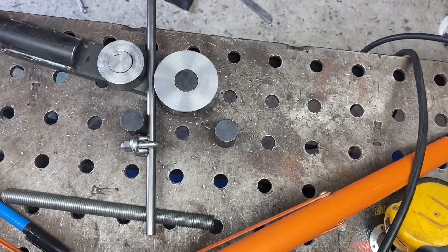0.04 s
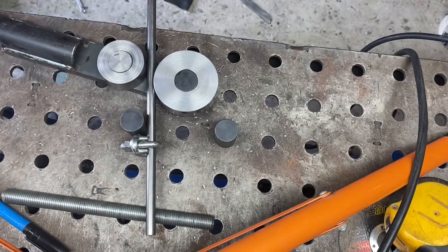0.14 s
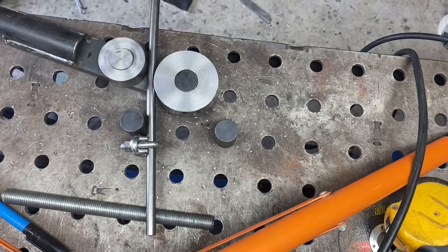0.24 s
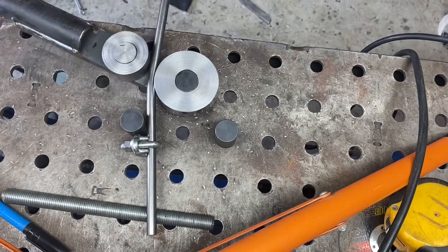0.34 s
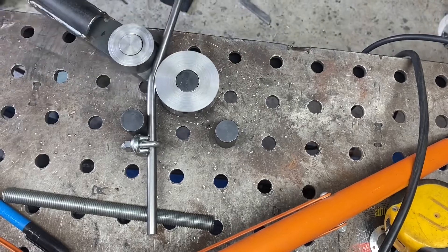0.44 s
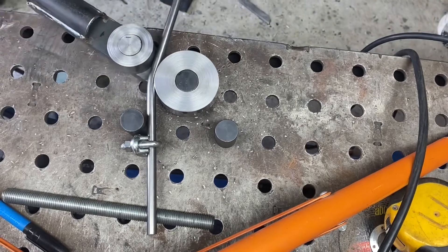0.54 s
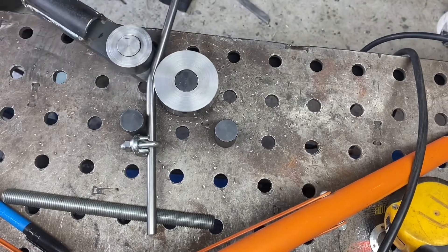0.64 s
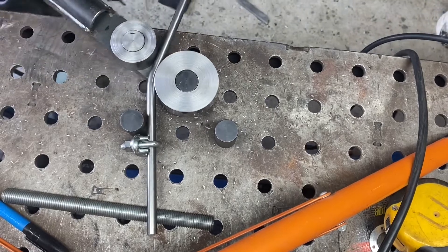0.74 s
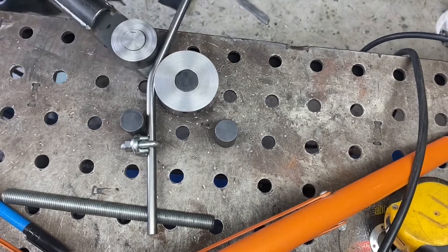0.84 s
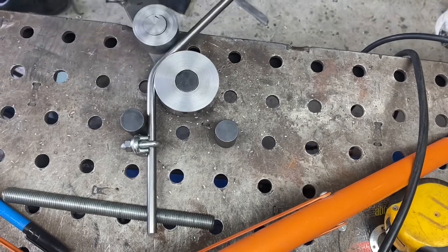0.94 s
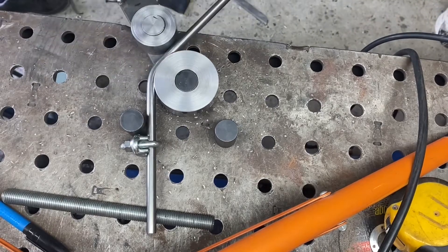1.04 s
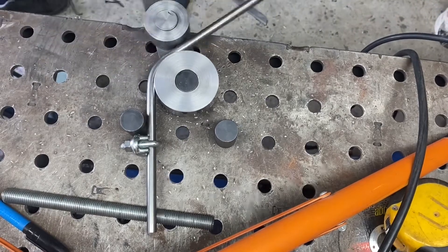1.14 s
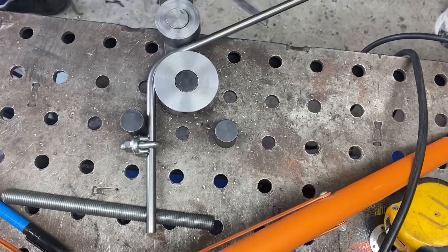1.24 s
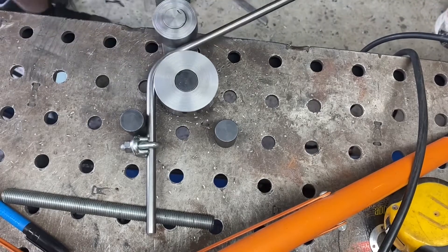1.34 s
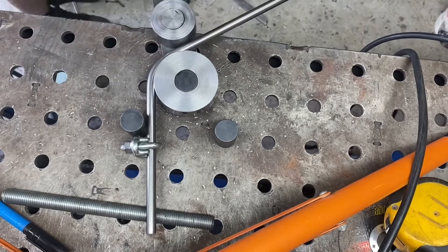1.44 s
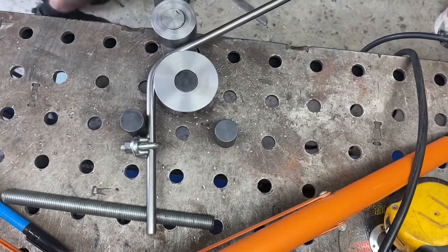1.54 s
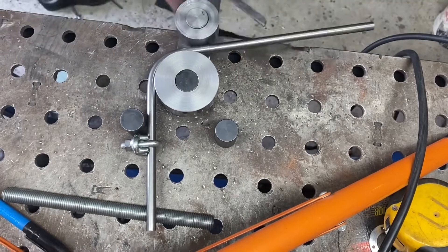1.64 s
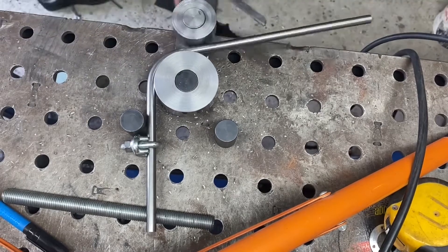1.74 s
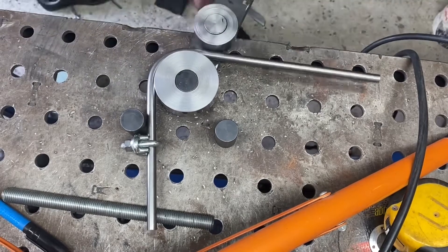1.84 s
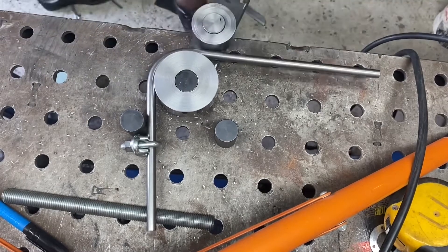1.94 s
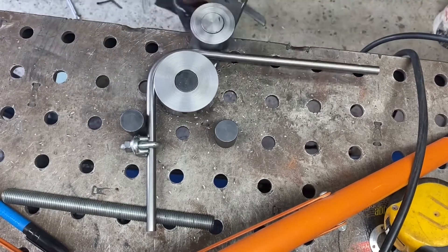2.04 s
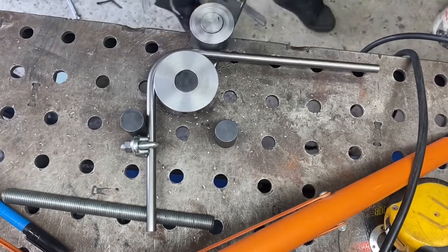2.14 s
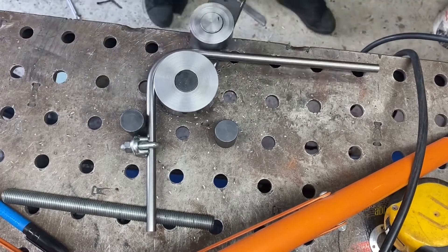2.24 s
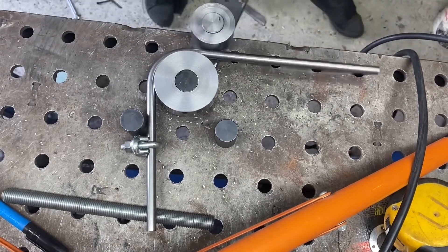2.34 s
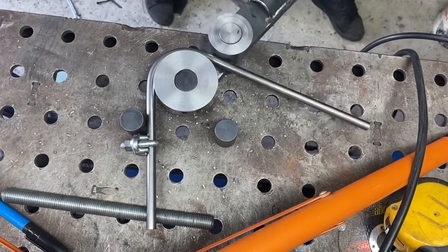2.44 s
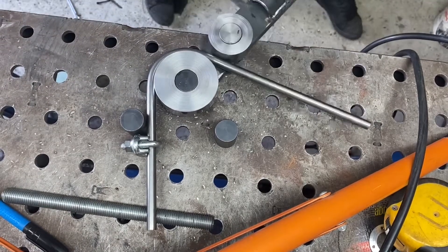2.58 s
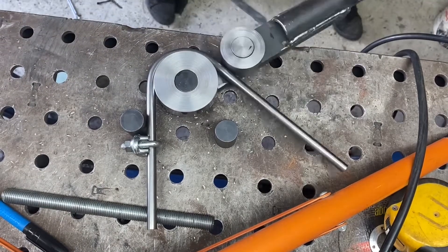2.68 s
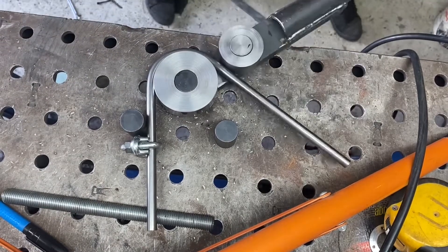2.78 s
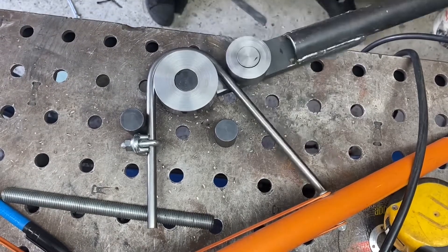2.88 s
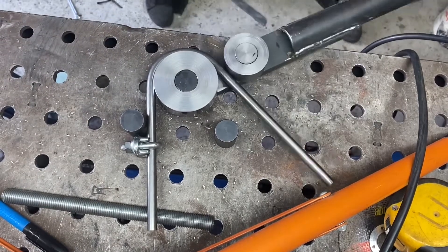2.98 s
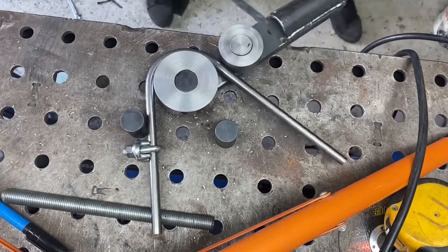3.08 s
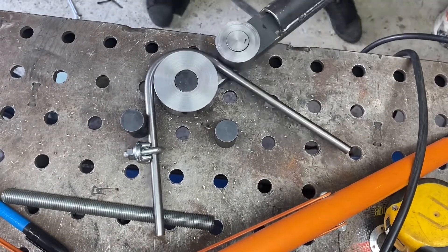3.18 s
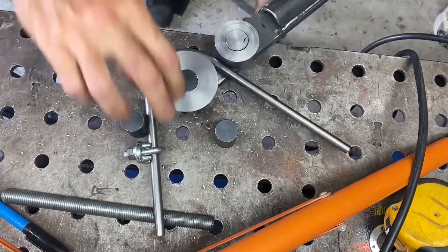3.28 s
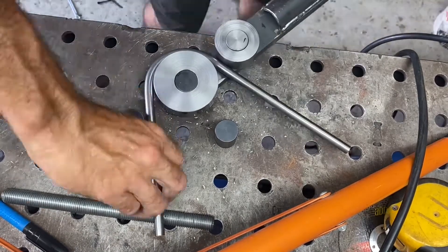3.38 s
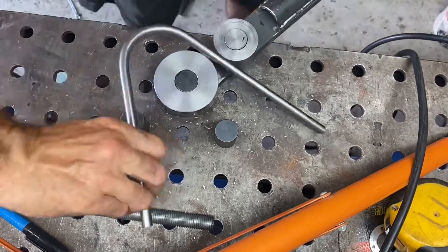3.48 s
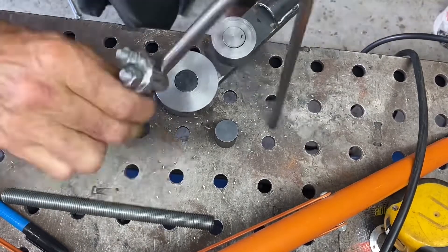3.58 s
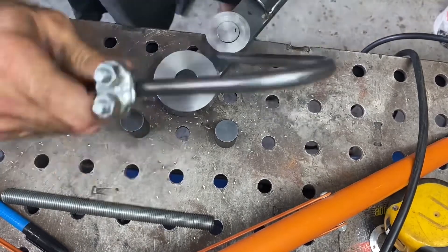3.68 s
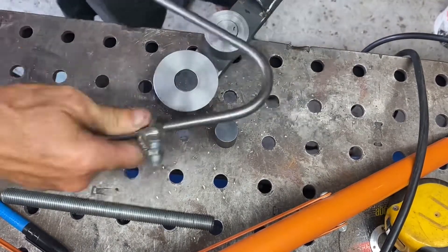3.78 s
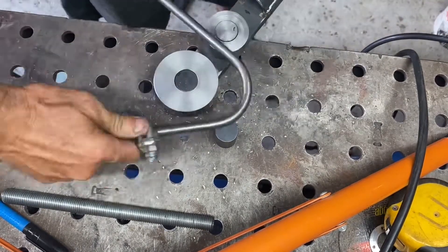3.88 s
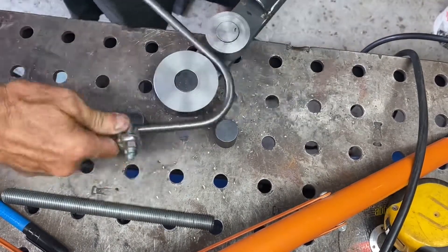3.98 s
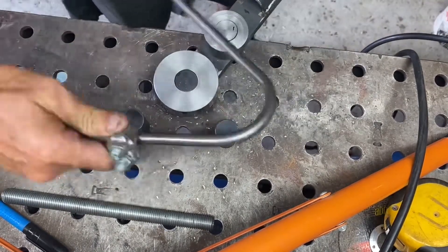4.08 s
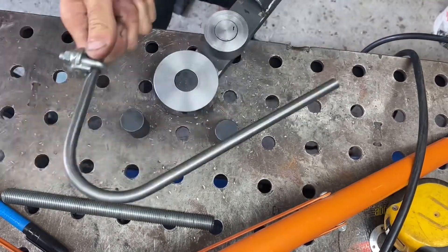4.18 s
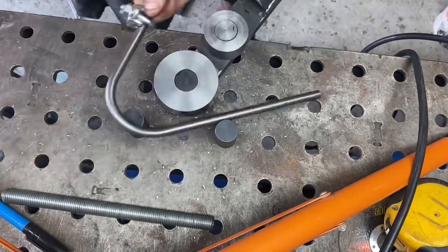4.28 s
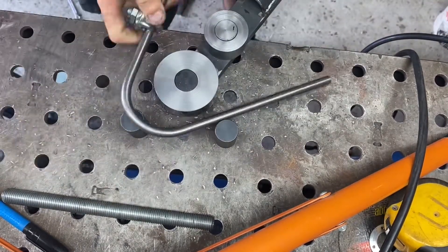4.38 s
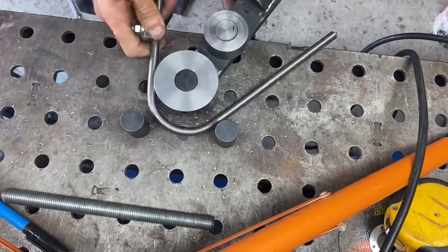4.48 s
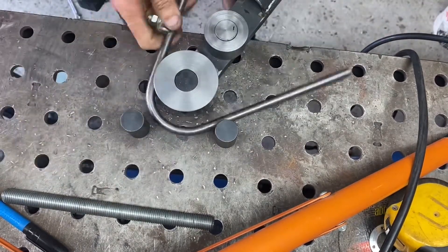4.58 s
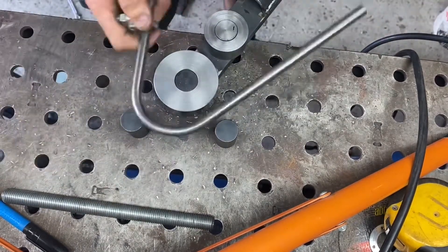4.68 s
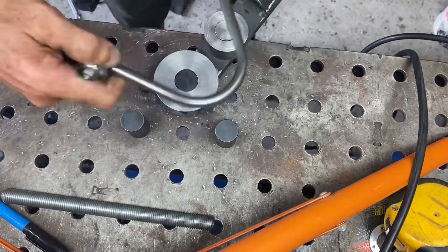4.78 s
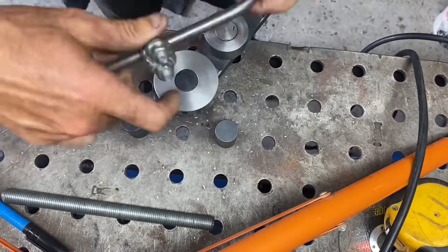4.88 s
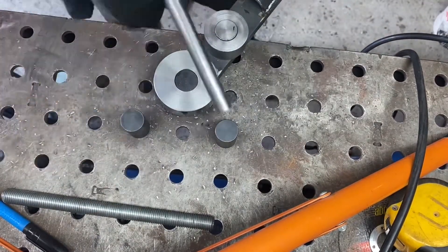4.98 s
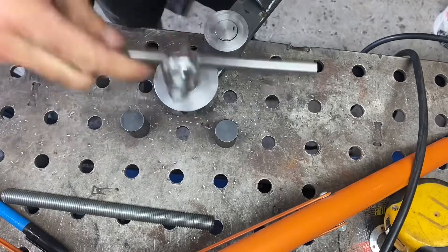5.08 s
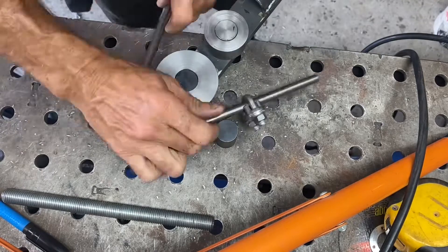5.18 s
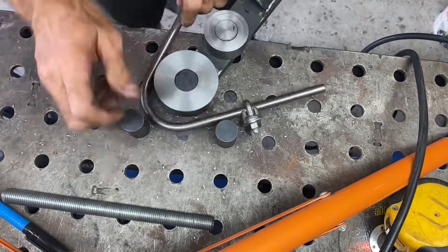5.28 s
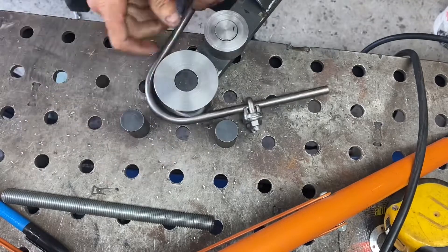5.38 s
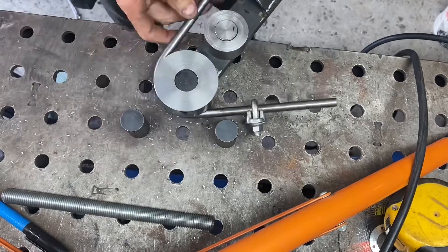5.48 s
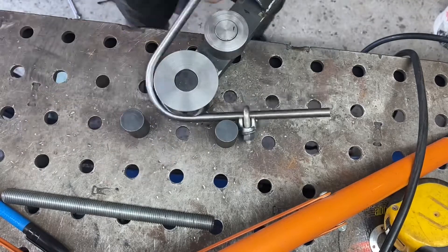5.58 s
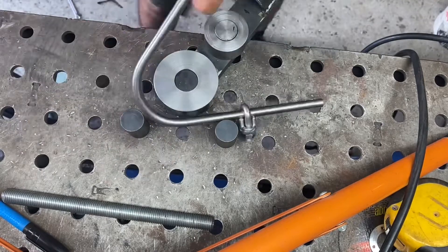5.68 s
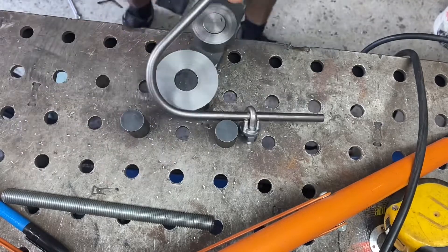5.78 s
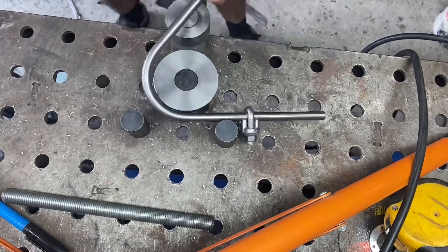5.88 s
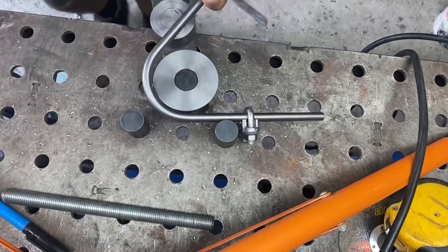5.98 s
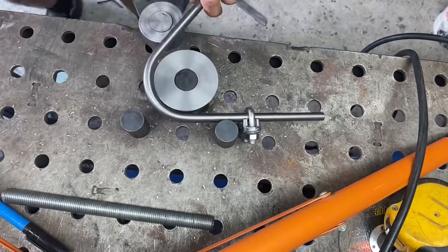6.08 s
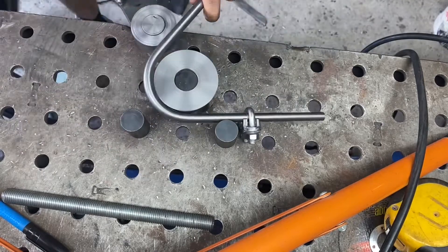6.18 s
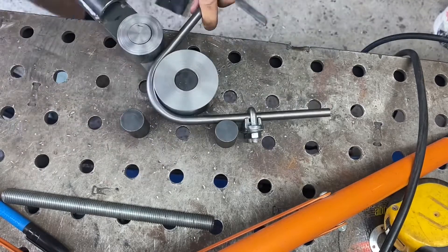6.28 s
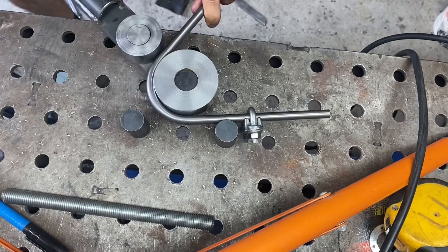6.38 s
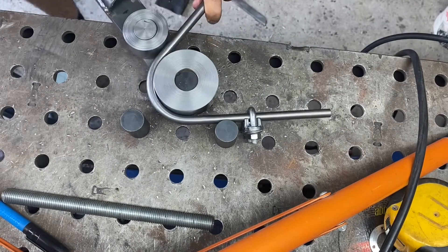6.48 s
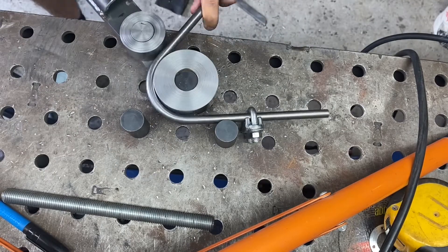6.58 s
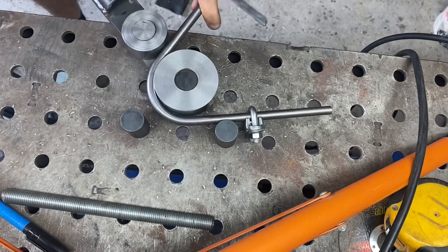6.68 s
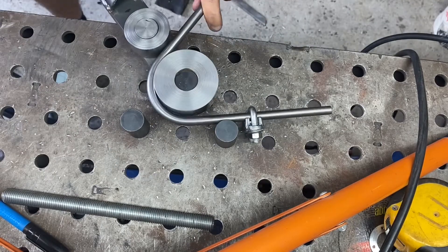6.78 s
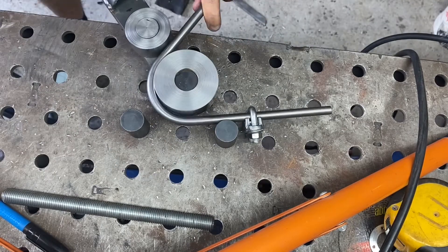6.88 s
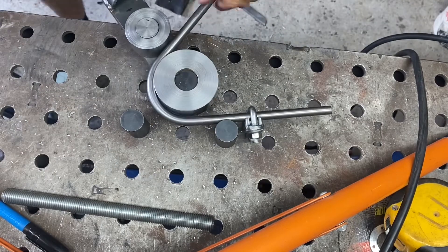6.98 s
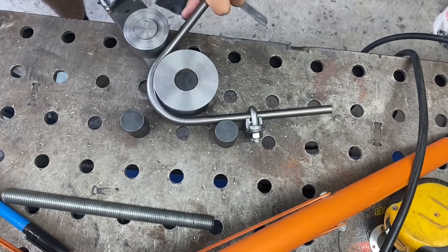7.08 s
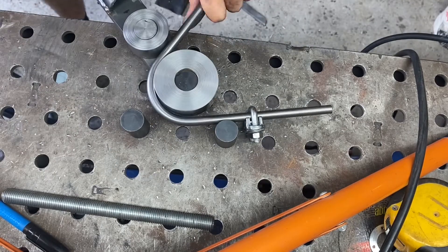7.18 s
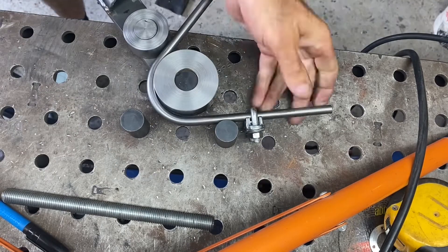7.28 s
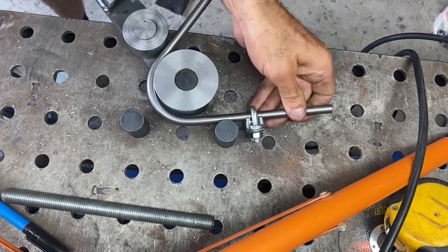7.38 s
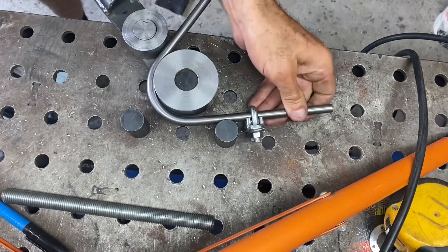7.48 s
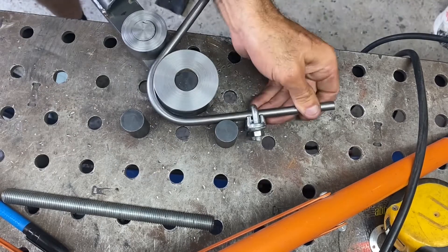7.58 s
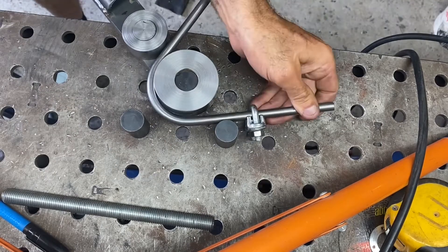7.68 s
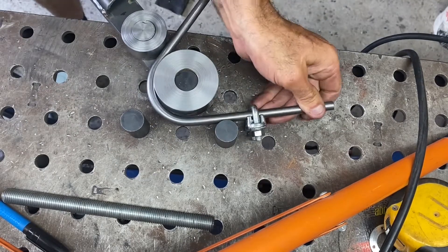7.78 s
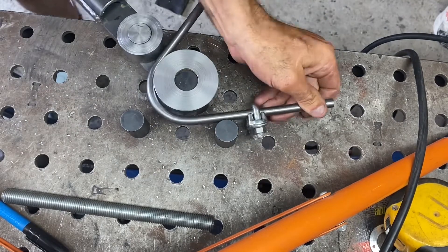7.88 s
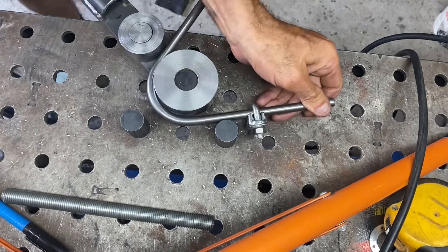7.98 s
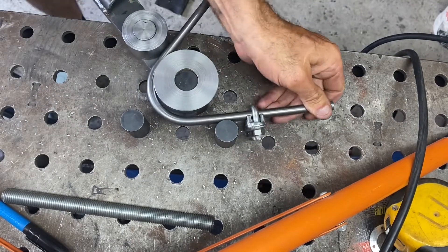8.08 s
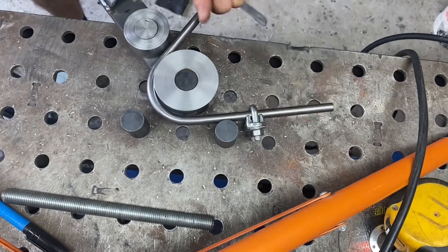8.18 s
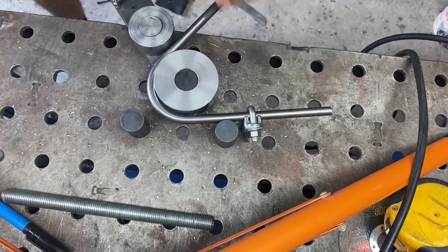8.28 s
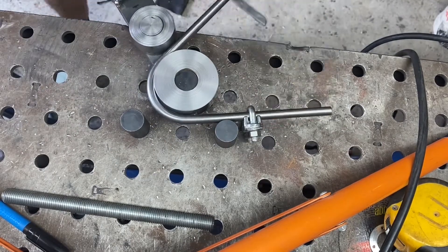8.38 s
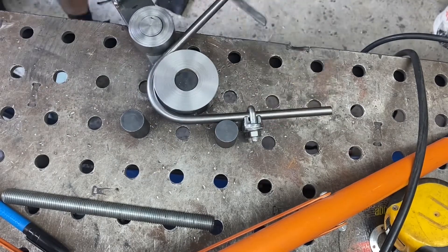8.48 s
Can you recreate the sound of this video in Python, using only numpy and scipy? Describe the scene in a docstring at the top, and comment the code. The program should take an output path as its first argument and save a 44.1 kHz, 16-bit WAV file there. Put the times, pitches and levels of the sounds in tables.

```python
"""A workshop, stereo microphone close over a thick steel table where a steel rod is bent round a die.
Far off, a motor whines faintly in the room noise. Close up, rod, clamp and lever scrape over the
table plate and make it rumble; the straining rod ticks, and sings as it slides. In front, the steel
clinks against pins and die: the hand-held rod rings briefly, lever, pin and nuts ring until damped."""
import sys
import numpy as np
from scipy import signal
from scipy.fft import rfft, irfft
from scipy.io import wavfile
from scipy.ndimage import uniform_filter1d

SR = 44100
rng = np.random.default_rng(int(sys.argv[2]) if len(sys.argv) > 2 else 0)


def pcm_store(signal):
    """Save signal as 16-bit PCM."""
    levels = np.round(np.clip(np.atleast_2d(signal), -1, 1) * 32767)
    wavfile.write(sys.argv[1], SR, levels.astype(np.int16).T)


N = 376161

# left-right likeness at the microphone, for spread sounds and for close blows: f/Hz, correlation
SPREAD_LIKENESS = [(60, 0.66), (180, 0.84), (550, 0.78), (1650, 0.36), (4970, 0.12), (15000, 0.95)]
CLOSE_LIKENESS = [(200, 1), (1500, 0.9), (3000, 0.18), (6000, 0.44), (12000, 0.76)]
# phase by which a close blow leads on the left: f/Hz, lead/rad
LEFT_LEAD = [(100, 0.3), (600, -1.7), (2400, 0.9), (5000, 0.7), (8000, -0.2)]
# colour of the room noise: f/Hz, relative level/dB
ROOM_COLOUR = [(18, -76), (30, -44), (107, -31), (176, -15.5), (235, 2), (814, -1.5), (904, -3),
               (979, -3.5), (1530, -4), (3050, -40.5), (13000, -24.5), (15200, -37), (16500, -49.5)]
# the distant motor and a second faint tone: t/s, f/Hz, level/dB
MOTOR_WHINE = [(0, 893, -73.5), (3.8, 893, -97), (4.1, 893, -86), (4.5, 893, -86.5), (4.7, 893, -71.5),
               (5.4, 893, -67), (5.6, 893, -96), (6.3, 893, -80), (6.5, 893, -76), (7.2, 893, -68),
               (7.35, 880, -76), (7.6, 850, -70.5), (7.9, 820, -68), (8.3, 808, -70), (8.53, 808, -60.5)]
FAINT_TONE = [(0, 730, -103), (3.9, 693, -98), (4.1, 774, -82), (4.6, 748, -85.5), (5.4, 781, -74),
              (5.6, 745, -99), (7.1, 640, -92.5), (7.2, 670, -68.5), (7.3, 765, -65.5), (7.4, 738, -66.5),
              (7.6, 750, -88), (8.3, 744, -66), (8.53, 748, -68.5)]
# low hums that come and go: t/s, length/s, f/Hz, level/dB
LOW_HUMS = [(5.047, 0.21, 246, -58.5), (8.264, 0.31, 248, -56.5)]
# modes of the table plate and of the hand-damped rod: f/Hz, width/Hz, relative level/dB
PLATE_MODES = [(172, 32, 0), (250, 40, -6), (310, 40, -7), (375, 40, -8), (505, 35, -3), (600, 50, -8),
               (880, 90, -6), (1250, 90, -2), (1480, 100, -3), (1900, 140, -3)]
ROD_MODES = [(2170, 34, 3), (2874, 34, -5), (3164, 29, 0), (4030, 63, -3), (4625, 63, 5.5),
             (4876, 8.6, -16.5), (5110, 41, 10.5), (5630, 97, -7.5), (6440, 23, 13), (6740, 9.9, 3),
             (7276, 40, -3), (7970, 23, 2.5), (8240, 48, -13), (7970, 39, -7.5), (8200, 70, 1),
             (9540, 25, -10.5), (8710, 36, -4), (9600, 64, -25), (10260, 20, -13), (10360, 75, 0),
             (11250, 43, -1.5), (12210, 43, -8.5), (12460, 19, -7), (12700, 73, -4), (13500, 33, -12.5),
             (14100, 39, -14), (13100, 110, -11.5), (14550, 88, -2)]
# hands and lever working on the plate: t/s, lowest modes/dB, upper modes/dB
HANDLING = [(0.0, -68, -75), (0.97, -59.5, -63), (1.45, -79.5, -64), (2.59, -66.5, -64.5),
            (3.23, -77, -72.5), (3.68, -74, -61.5), (4.25, -75.5, -73), (4.47, -55.5, -65.5),
            (4.7, -70.5, -80), (4.96, -80, -72), (5.13, -70, -70.5), (5.41, -75.5, -66.5), (6.01, -63, -65),
            (7.06, -70, -72), (7.7, -46.5, -66.5), (7.93, -63.5, -59.5), (8.15, -70.5, -72),
            (8.53, -57, -60)]
# soft blows on the plate: t/s, lowest modes/dB, hollow modes/dB, hold/s
PLATE_BUMPS = [(0.09, -65, -83, 0.022), (0.2, -82, -69, 0.03), (0.336, -55, -55, 0.04),
               (0.37, -58, -55, 0.059), (0.432, -53, -55.5, 0.029), (0.605, -55.5, -80, 0.018),
               (0.747, -61, -49.5, 0.01), (0.883, -53, -38.5, 0.038), (0.97, -64, -40, 0.03),
               (1.019, -55, -42.5, 0.02), (1.128, -45, -45.5, 0.028), (1.363, -72, -61, 0.034),
               (1.58, -37.5, -43, 0.018), (1.649, -49.5, -63, 0.012), (1.829, -62, -53, 0.018),
               (1.943, -66, -47, 0.011), (2.178, -65, -68, 0.012), (2.36, -60, -57, 0.043),
               (2.411, -57, -55, 0.038), (2.473, -68, -57, 0.038), (2.603, -58, -53.5, 0.033),
               (2.845, -55, -53, 0.015), (2.944, -61.5, -52.5, 0.021), (3.307, -69, -78, 0.036),
               (3.404, -64, -65, 0.055), (3.587, -76, -47.5, 0.012), (3.792, -46, -40, 0.01),
               (3.922, -47.5, -55, 0.019), (4.249, -49, -47, 0.028), (4.42, -39, -34.5, 0.01),
               (4.499, -58, -51.5, 0.026), (4.566, -61, -54, 0.043), (4.632, -60, -60, 0.024),
               (4.969, -50, -46.5, 0.021), (5.198, -44, -38.5, 0.01), (5.499, -60.5, -68, 0.039),
               (5.582, -59, -61, 0.036), (5.713, -62, -55, 0.08), (5.784, -59, -54.5, 0.026),
               (5.859, -53, -71, 0.028), (6.018, -54, -58, 0.026), (6.222, -52, -49, 0.01),
               (6.259, -56, -41.5, 0.013), (6.405, -64, -52, 0.026), (6.574, -60.5, -66.5, 0.026),
               (6.688, -57, -64, 0.026), (6.827, -55.5, -72.5, 0.023), (7.161, -55.5, -63, 0.027),
               (7.293, -53, -67, 0.035), (7.439, -41, -50, 0.019), (7.565, -40, -32.5, 0.01),
               (7.621, -40.5, -62, 0.015), (7.667, -54, -64, 0.022), (7.716, -51.5, -60, 0.038),
               (7.83, -41, -39.5, 0.017), (7.879, -65, -42.5, 0.015), (8.146, -56.5, -57.5, 0.053),
               (8.2, -62, -53.5, 0.037), (8.414, -57, -61, 0.03)]
# steel sliding on steel: t/s, level/dB, treble tilt/(dB per octave)
SLIDING = [(0.0, -63, 6.5), (0.31, -50.5, 4.5), (0.71, -66, -2), (0.88, -55, -1), (1.37, -62.5, -3.5),
           (1.49, -62, -3), (1.76, -57, -2.5), (1.92, -63.5, 0.5), (2.47, -57.5, -1.5), (2.63, -67, 0.5),
           (2.85, -66, -2.5), (3.56, -58, 1.5), (3.75, -68, -2), (3.87, -63.5, -0.5), (4.16, -67, 2.5),
           (4.3, -69, 5.5), (4.42, -46.5, 0), (4.47, -49.5, 2), (4.51, -52.5, 1.5), (4.63, -68, -5.5),
           (4.84, -72.5, 9.5), (5.39, -59.5, 0.5), (6.03, -57.5, -0.5), (6.15, -62, 1.5), (6.41, -65.5, 1),
           (7.24, -72.5, -1.5), (8.43, -72.5, -5.5), (8.53, -59, -1.5)]
# colour of the scrape and of a clink: f/Hz, relative level/dB
GRIT_COLOUR = [(180, -52), (300, -11.5), (427, -8.5), (496, -6.5), (567, 6.5), (1090, -14), (1250, -4.5),
               (3770, -9.5), (10300, -10), (15400, -16), (16500, -34)]
CLINK_COLOUR = [(880, -41.5), (1500, -9.5), (3220, -0.5), (4050, -3.5), (4570, -4.5), (6110, -6.5),
                (9600, 1.5), (11700, -0.5), (15100, -2), (15900, 3.5), (16500, -25.5)]
# the rod singing as it slides: t/s, length/s, f/Hz, width/Hz, level/dB
ROD_SINGS = [(2.36, 0.05, 2660, 100, -54.5), (3.438, 0.13, 4750, 250, -52), (4.29, 0.16, 3580, 492, -53),
             (4.282, 0.092, 5400, 980, -49), (4.458, 0.071, 2900, 150, -46), (5.021, 0.11, 5300, 720, -61),
             (7.9, 0.09, 2600, 120, -56), (7.21, 0.1, 4900, 3400, -69.5), (5.938, .04, 2630, 150, -44),
             (6.206, 0.046, 3100, 199, -61), (6.381, 0.073, 3400, 200, -67)]
# dry ticks of the straining rod and its pins: t/s, peak/dB, f/Hz
STRAIN_TICKS = [(0.979, -17.5, 1490), (1.256, -48, 1380), (1.302, -46, 840), (1.624, -33, 867),
                (1.648, -36, 1080), (1.949, -40, 625), (2.131, -44, 651), (2.187, -53, 910),
                (2.209, -49.5, 634), (2.279, -49.5, 1080), (2.304, -51, 655), (2.697, -52, 622),
                (2.725, -51, 1140), (2.858, -45.5, 575), (2.939, -42, 1345), (3.798, -27, 1176),
                (4.417, -36, 1233), (5.967, -38, 866), (7.569, -35, 552), (7.835, -38.5, 1180)]
# modes of lever arm, roller pin and clamp nuts: f/Hz, relative level/dB, t60/s
LEVER_MODES = [(2575, -9, .3), (3525, -8, .2), (5680, -10, .3), (5800, -12, .3), (6525, -14, .08),
               (8361, 0, .3), (8417, 0, .3), (8540, -11, .2), (11480, 1, .3), (11543, -6, .3),
               (14832, -3, .3), (14943, 0, .3)]
PIN_MODES = [(6830, -14, 0.12), (7870, -11, 0.099), (9539, -49, 1.5), (10390, 0, 0.24), (11400, -9, 0.2),
             (13000, -7, 0.098)]
NUT_MODES = [(11150, 0, .2), (13700, -7, .1)]
# lever hitting its stop, pin tinkling, nuts jingling: t/s, level/dB, time until damped/s
LEVER_KNOCKS = [(0.966, -19, 0.012), (.983, -21.5, 0.02), (1.018, -16, 0.016), (1.046, -67.5, 0.028)]
PIN_TINKLES = [(2.98, -33, .13), (3.195, -34, 0.0085)]
NUT_JINGLES = [(3.316, -44, .025)]
# rod and clamp striking steel: t/s, ring peak/dB, high ring/Hz, low ring/Hz, knock re ring/dB, knock/Hz,
# treble tilt/(dB per octave), crack t60/s, relative chatter/dB, chatter length/s
ROD_CLINKS = [(0.9632, -12, 8200, 2260, -0.5, 1350, -1.5, 0.041, -10, 0.025),
              (1.0186, -14, 11200, 2640, -19, 1580, 3, 0.059, -6.5, 0.029),
              (1.479, -36.5, 13400, 1950, -5, 1350, -7, 0.07, -14, 0.032),
              (1.522, -39, 8130, 3950, -15, 1400, 2, 0.034, -20, 0.035),
              (1.5494, -38.5, 7600, 5100, -17, 888, -2, 0.03, -5, 0.026),
              (1.5733, -32, 12900, 4800, -9, 999, -2.5, 0.021, -8, 0.078),
              (1.786, -28, 13400, 2100, -17, 1950, -5.5, 0.024, -7.5, 0.049),
              (1.928, -25, 6450, 2540, -10, 811, -1, 0.042, -4, 0.015),
              (2.08, -41, 9090, 5900, -14, 1610, 8, 0.027, -20, 0.024),
              (2.1864, -38.5, 6600, 2480, -3, 880, -7, 0.037, -10, 0.038),
              (2.355, -23, 13500, 4520, -19, 2080, -3, 0.018, -13.5, 0.038),
              (2.5858, -29, 13400, 4600, -12.5, 1960, -2, 0.02, -3, 0.057),
              (2.829, -27.5, 14000, 4520, -14, 1930, -3, 0.012, -6, 0.038),
              (2.9785, -38, 10300, 5200, -13, 1690, -0.5, 0.03, 2, 0.055),
              (3.132, -46, 13700, 1900, -20, 842, 12, 0.03, -1, 0.081),
              (3.157, -51, 11900, 3350, -26, 1360, 4, 0.03, -22, 0.035),
              (3.1757, -39, 11500, 5630, -19, 980, 3, 0.03, -11, 0.035),
              (3.1966, -33, 10300, 5230, -32, 1400, 2, 0.03, -14, 0.035),
              (3.26, -39.5, 11500, 3270, -26, 891, -1.5, 0.027, -16, 0.049),
              (3.281, -40.5, 13400, 2100, -4, 1950, -6, 0.024, -13, 0.032),
              (3.3948, -27, 8000, 4700, -12, 1450, -4, 0.045, -14, 0.026),
              (3.3997, -21.5, 6360, 2660, -14, 830, -2, 0.056, -32, 0.015),
              (3.414, -27, 11000, 4630, -31, 899, 3, 0.026, -14, 0.052),
              (3.4814, -33, 13200, 4620, -35, 1250, 2, 0.03, -37, 0.04),
              (3.5403, -24, 6460, 4530, -38, 1530, 3, 0.03, -4, 0.03),
              (3.588, -16.5, 6900, 5070, -27, 1970, -2.5, 0.02, -11.5, 0.035),
              (3.6122, -10, 6900, 6260, -29, 1990, 3, 0.039, -22, 0.013),
              (3.6648, -19, 14400, 4500, -42, 1810, 5, 0.036, -12, 0.021),
              (3.6915, -37, 15400, 4660, -15, 1400, -4, 0.03, -26, 0.023),
              (3.7983, -8.5, 13340, 2200, -23.5, 1200, -1.5, 0.031, -28.5, 0.048),
              (3.874, -24.5, 9800, 4800, -33, 1960, 0, 0.04, -16, 0.032),
              (3.8923, -19, 10000, 4400, -27, 1170, 0.5, 0.032, -7, 0.035),
              (3.9108, -22.5, 9800, 2950, -33, 2000, -3, 0.023, -10, 0.04),
              (3.925, -10.5, 7400, 4430, -30, 1110, -3.5, 0.035, -31, 0.018),
              (3.958, -24, 9100, 4500, -39, 1420, -0.5, 0.032, -21, 0.019),
              (4.2396, -6.5, 10600, 5770, -26.5, 1280, 4.5, 0.023, -22, 0.053),
              (4.2606, -6.5, 7370, 4820, -35.5, 1730, 0.5, 0.039, -5.5, 0.028),
              (4.4, -31.5, 6560, 5530, -31, 1330, -4, 0.026, 2, 0.038),
              (4.4162, -7, 9040, 2960, -44, 1250, 2.5, 0.054, -9, 0.012),
              (4.461, -15.5, 9600, 3230, -20, 1310, -2.5, 0.05, -33, 0.012),
              (4.5008, -14.5, 9150, 5380, -48, 2000, 2, 0.063, -7, 0.016),
              (4.508, -17.5, 9600, 5290, -44, 1450, 4, 0.03, -23, 0.021),
              (4.5275, -28, 9600, 3250, -18, 1250, -5, 0.03, -29, 0.035),
              (4.557, -21, 12500, 4730, -31, 2000, -1.5, 0.03, -11.5, 0.042),
              (4.5846, -8.5, 8200, 4500, -32, 1320, 2.5, 0.042, -32, 0.043),
              (4.6348, -15.5, 8380, 5400, -33.5, 1230, 1.5, 0.03, -7, 0.026),
              (4.9412, -40, 13600, 6000, -16.5, 1399, 6, 0.031, -23, 0.048),
              (4.9725, -18, 10300, 4560, -17.5, 1630, 0, 0.029, -30, 0.041),
              (4.9904, -25.5, 10600, 4730, -28, 1240, 3, 0.034, -12.5, 0.028),
              (5.1705, -10.5, 8050, 5140, -28.5, 1210, -0.5, 0.03, -16.5, 0.076),
              (5.1946, -11, 6350, 5470, -29, 1250, 4, 0.048, -12.5, 0.048),
              (5.214, -16.5, 10000, 4630, -24, 1190, -0.5, 0.026, -10, 0.035),
              (5.2577, -25, 6130, 4600, -24, 883, -1, 0.03, -16.5, 0.059),
              (5.3284, -35.5, 8050, 3280, -16, 1390, -2, 0.036, -14, 0.044),
              (5.3677, -36, 6100, 3500, -15, 1840, -3, 0.048, -7, 0.022),
              (5.424, -41, 6770, 2900, -18, 1780, -4, 0.03, -22, 0.035),
              (5.4887, -30, 7870, 3950, -34, 829, 1.5, 0.053, -16, 0.023),
              (5.5266, -30.5, 6700, 3570, -16, 1170, -1.5, 0.042, -17.5, 0.054),
              (5.578, -15.5, 8060, 4640, -29.5, 1190, 1.5, 0.046, -15, 0.019),
              (5.6366, -22.5, 7050, 4800, -34, 2000, 5, 0.053, -5, 0.022),
              (5.6494, -24.5, 8300, 5480, -25, 1250, 1.5, 0.036, 2, 0.013),
              (5.7104, -27.5, 9600, 4840, -19.5, 1560, 4, 0.051, -3, 0.019),
              (5.722, -21, 11200, 3060, -35, 1600, 0.5, 0.038, -30, 0.035),
              (5.7756, -35, 9200, 3120, -16, 867, -1.5, 0.023, -20, 0.058),
              (5.9418, -26.5, 7060, 2630, -17, 845, 0, 0.057, -5, 0.026),
              (5.965, -29, 6700, 2520, -7.5, 877, -3, 0.041, -66, 0.013),
              (6.011, -16.5, 8050, 4800, -25, 1160, 1, 0.039, -28, 0.022),
              (6.0551, -48, 9570, 2410, -18, 1520, -6, 0.03, -10, 0.035),
              (6.076, -39.5, 9500, 4830, -15, 1560, -2, 0.036, -3, 0.029),
              (6.12, -25.5, 9900, 1930, -14, 1830, 0.5, 0.059, -17, 0.016),
              (6.218, -38.5, 10100, 3230, -10.5, 1230, -4, 0.026, 5, 0.086),
              (6.2634, -15, 10800, 1940, -27, 2040, -1, 0.039, -16, 0.0348),
              (6.2676, -15.5, 11060, 4500, -21, 2100, 1.5, 0.04, -14, 0.039),
              (6.295, -28, 6940, 3870, -12.5, 880, -0.5, 0.05, -19, 0.017),
              (6.339, -33, 6450, 5460, -24, 1180, 0, 0.032, -30, 0.023),
              (6.6316, -23.5, 7700, 3110, -21.5, 1590, -0.5, 0.034, -23, 0.024),
              (6.95, -51.5, 11170, 2193, -17.5, 896, 2, 0.03, -31, 0.041),
              (7.8325, -18.5, 13600, 5375, -19.5, 1190, 0, 0.029, -35, 0.08),
              (7.8793, -33, 8190, 5300, -24, 1950, -5, 0.034, -14, 0.032),
              (7.892, -14, 7700, 3010, -23, 1240, 0.5, 0.029, -23.5, 0.033),
              (7.988, -35, 9100, 5040, -20.5, 984, -5.5, 0.029, -19, 0.029),
              (8.0045, -32, 6500, 5400, -30, 807, -2, 0.028, -20, 0.014),
              (8.1963, -30, 6150, 3160, -8, 1980, -9.5, 0.036, -17, 0.026),
              (8.4213, -31.5, 6950, 1910, 6, 1580, -5, 0.025, 3, 0.027),
              (8.4577, -29, 10700, 1960, -11, 1520, -1.5, 0.03, 5, 0.033)]
# short rubs and creaks with a soft start: columns as for the clinks
ROD_RUBS = [(0.0334, -35, 14100, 2870, -10.5, 950, -0.18, 0.07, -13, 0.031),
            (0.1555, -50, 12700, 5450, -11, 855, -2, 0.035, -12, 0.066),
            (0.399, -42.5, 10000, 4870, -16, 1360, -1.4, 0.026, -4, 0.044),
            (0.4908, -48, 8770, 2400, -6, 929, -1.8, 0.035, -6, 0.033),
            (0.5091, -37.5, 10450, 1930, -13, 1350, -1.7, 0.025, -12, 0.016),
            (0.611, -41, 11400, 2030, -8.5, 1410, -2, 0.035, -17, 0.023),
            (0.6669, -41, 6900, 2450, -5, 1510, -1.3, 0.035, -10, 0.034),
            (0.6783, -36, 7650, 4760, -13, 1380, -1.4, 0.026, -16, 0.071),
            (0.7372, -38.5, 9900, 2990, -9, 870, -1.4, 0.035, -12, 0.019),
            (0.8237, -48, 8000, 5870, -24, 910, -1.1, 0.021, 8, 0.098),
            (0.868, -31.5, 16200, 3410, -15, 1570, 1, 0.017, 21, 0.051),
            (0.9784, -18, 14900, 3720, -10, 1450, 0.16, 0.028, -9, 0.066),
            (1.121, -37.5, 8200, 3460, -6, 1540, -2.7, 0.012, -1, 0.056),
            (1.2566, -47.5, 9600, 1960, 4.5, 1380, -1.4, 0.029, -9, 0.066),
            (1.2988, -40.5, 8000, 2040, -4.5, 810, -3.2, 0.029, -15, 0.079),
            (1.3693, -41.5, 11300, 3380, -7, 1460, 0.27, 0.028, -12, 0.043),
            (1.6251, -34, 8560, 2060, -2.5, 870, -2.5, 0.027, -14.5, 0.04),
            (1.6475, -40, 8600, 4210, 0.5, 1080, -0.61, 0.019, -16, 0.046),
            (1.7195, -40, 7900, 2700, -5.5, 1400, -2.3, 0.027, -21, 0.025),
            (1.9046, -35.5, 7800, 2670, -2.5, 1400, -2.8, 0.048, -7, 0.06),
            (1.9825, -40, 13900, 2360, -5, 1410, -2, 0.032, -15, 0.021),
            (2.0643, -44, 7950, 2800, -17, 1470, -1.4, 0.03, -9, 0.035),
            (2.1305, -51, 6400, 2230, 2, 770, -2.4, 0.035, -9, 0.04),
            (2.152, -43, 5860, 3930, -1.5, 1440, -1.8, 0.029, -20, 0.09),
            (2.464, -38, 6840, 2270, -6, 816, -0.55, 0.016, -13.5, 0.034),
            (2.5082, -48, 9700, 2160, -12, 872, -3.4, 0.035, -12, 0.026),
            (2.9484, -48, 9800, 2600, 3, 1340, -2, 0.017, -13.5, 0.12),
            (3.4457, -35, 8400, 5500, -33, 1210, -1.3, 0.039, 1, 0.027),
            (3.464, -30.5, 6800, 4570, -34, 1260, 0.2, 0.027, -12, 0.028),
            (4.3073, -34, 6390, 5860, -17, 1180, -1, 0.032, 0, 0.042),
            (4.3477, -39, 6270, 4600, -24, 1170, -2, 0.03, -8, 0.065),
            (6.399, -53, 11300, 3160, -18, 1080, -2, 0.035, -12, 0.024),
            (7.5617, -46.5, 7880, 2280, 5.5, 1220, -3.6, 0.035, -19, 0.023),
            (7.6888, -49, 10500, 1920, 3, 1960, -2.3, 0.035, -20, 0.013),
            (8.3823, -43.5, 12100, 1940, -6, 1950, -1.8, 0.035, -12, 0.015)]

CLINK_RISE_S, RUB_RISE_S, BUMP_RISE_S = 0.00073, 0.0055, 0.005
BUMP_FALL_DB_PER_S, TICK_PEAK_CYCLES, PAN_SCATTER_DB = 601, 1.23, 1.5
ROOM_NOISE_DB, REFLECTIONS_DB = -65, -20.5
HOLLOW_RE_LOW_DB, THUD_RE_RING_DB = -13.5, -33.5
BASS_CUT_HZ, SHELF_HZ, TOP_HZ = 150, 15750, 16900


def gain_of(db):
    return 10 ** (np.asarray(db) / 20)


def unit_rms(x):
    return x / np.sqrt(np.mean(x ** 2) + 1e-20)


def drift(samples):
    """Random wander of unit RMS, smoothed over so many samples."""
    return unit_rms(uniform_filter1d(rng.standard_normal(N), size=samples))


def at_hz(points, hz):
    f, value = np.transpose(points)
    return np.interp(np.log(hz + 1), np.log(f + 1), value)


def at_time(rows, t):
    times, *columns = np.transpose(rows)
    return [np.interp(t, times, column) for column in columns]


def add(mix, start_s, sound):
    part = mix[:, round(start_s * SR):][:, :sound.shape[1]]
    part += sound[:, :part.shape[1]]


def noise_pair(shape, hz, likeness):
    """Two complex noise spectra, as alike as the two sides of the microphone hear them."""
    a, b, c, d = rng.standard_normal((4, *shape))
    same = np.clip(at_hz(likeness, hz), 0, 1).reshape(-1, *[1] * (len(shape) - 1))
    left = a + 1j * b
    return np.array([left, same * left + np.sqrt(1 - same ** 2) * (c + 1j * d)])


def resonances(table, hz, strengths):
    """Response of damped modes, each excited by its own amount."""
    f, width, db = np.transpose(table)[:, :, None]
    return (strengths[:, None] * gain_of(db) / (1 + 2j * (hz - f) / width)).sum(0)


def wash(colour_db, patchy_db, size):
    """Wide noise of unit RMS, coloured by colour_db(hz, t), in drifting patches."""
    hop = size // 4
    hz, t = np.fft.rfftfreq(size, 1 / SR), np.arange(N // hop + 5) * hop / SR
    patches = rng.standard_normal((len(t), len(hz))).T
    patches = unit_rms(uniform_filter1d(uniform_filter1d(patches, size=6, axis=0), size=8, axis=1))
    spectra = noise_pair(patches.shape, hz, SPREAD_LIKENESS)
    spectra *= gain_of(colour_db(hz[:, None], t) + patchy_db * patches)
    return unit_rms(signal.istft(spectra, nperseg=size, noverlap=size - hop)[1][:, :N])


def room_noise():
    """All round the microphone: the workshop's soft, steady noise."""
    return gain_of(ROOM_NOISE_DB) * wash(lambda hz, t: at_hz(ROOM_COLOUR, hz), patchy_db=2.2, size=1024)


def motor_and_hums():
    """Far off, centred: a wavering motor whine and a second tone, each with a weak octave; short hums."""
    t, out = np.arange(N) / SR, np.zeros((1, N))
    for rows, octave_db in ((MOTOR_WHINE, -10.5), (FAINT_TONE, -14)):
        hz, db = at_time(rows, t)
        phase = 2 * np.pi * np.cumsum(hz + 3.6 * drift(3000)) / SR
        flicker_db = 4 * drift(2500)
        out += gain_of(db + flicker_db) * (np.sin(phase) + gain_of(octave_db) * np.sin(2 * phase))
    for start_s, length_s, hz, db in LOW_HUMS:
        hum = gain_of(db) * np.sin(2 * np.pi * hz * t[:round(length_s * SR)])
        add(out, start_s, hum[None] * signal.windows.tukey(len(hum), .4))
    return out


def reflections(x):
    """The room answers with sparse echoes of random sign, different on each side."""
    slots = np.arange(150, 9000, 20)
    taps = np.zeros((2, slots[-1] + 20))
    delays = slots + rng.integers(0, 20, (2, len(slots)))
    np.put_along_axis(taps, delays, rng.choice([-1., 1.], delays.shape), axis=1)
    taps *= gain_of(-60 * np.arange(taps.shape[1]) / SR / 0.04)  # t60 of 40 ms
    return signal.oaconvolve(x, taps / np.linalg.norm(taps[0]), axes=1)[:, :N]


def plate_bump(low_db, hollow_db, hold_s):
    """A soft blow swings the plate's lowest modes and its hollow pair: quick rise, hold, steady fall."""
    def swing(hz, width, db):
        cycles = (hz + 0.4 * width * rng.normal()) * t + rng.random()
        return gain_of(db) * np.sin(2 * np.pi * (cycles + 0.09 * rng.normal(size=(2, 1))))

    t = np.arange(round(SR / 4)) / SR
    envelope = np.minimum(t / BUMP_RISE_S, 1) * gain_of(-BUMP_FALL_DB_PER_S * np.maximum(t - hold_s, 0))
    low = sum(swing(*mode) for mode in PLATE_MODES[:3])
    hollow = sum(swing(*mode) for mode in PLATE_MODES[4:6])
    return envelope * (gain_of(low_db) * low + gain_of(hollow_db) * hollow)


def plate_rumble():
    """Under the microphone: steady handling stirs noise in the plate's modes, with bumps on top."""
    def mode_noise(table, steepness):
        response = lambda hz: abs(resonances(table, hz[:, 0], np.ones(len(table))))[:, None]
        return wash(lambda hz, t: steepness * np.log10(response(hz)), patchy_db=1.5, size=1024)

    low_db, upper_db = at_time(HANDLING, np.arange(N) / SR)
    low = mode_noise(PLATE_MODES[:3], steepness=36)
    hollow = mode_noise(PLATE_MODES[4:5], steepness=40)
    upper = mode_noise(PLATE_MODES[3:], steepness=12)
    out = gain_of(low_db) * (low + gain_of(HOLLOW_RE_LOW_DB) * hollow) + gain_of(upper_db) * upper
    for start_s, *bump in PLATE_BUMPS:
        add(out, start_s, plate_bump(*bump))
    return out


def scrape():
    """Grit under sliding steel: uneven hiss whose loudness and brightness each drift over time."""
    colour_db = lambda hz, t: at_hz(GRIT_COLOUR, hz) + at_time(SLIDING, t)[1] * np.log2(hz / 6000 + .05)
    level_db = at_time(SLIDING, np.arange(N) / SR)[0] + 0.83 * drift(300)
    return gain_of(level_db) * wash(colour_db, patchy_db=5, size=256)


def rod_sing(length_s, centre_hz, width_hz, db):
    """Friction noise inside one resonance of the sliding rod."""
    size = round(length_s * SR)
    hz = np.fft.rfftfreq(size, 1 / SR)
    friction = noise_pair(hz.shape, hz, SPREAD_LIKENESS)
    tone = irfft(friction / (1 + (2 * (hz - centre_hz) / width_hz) ** 2), size)
    return gain_of(db) * unit_rms(tone) * signal.windows.tukey(size, .5)


def strain_tick(db, hz):
    """Rod and pins tick under strain: a few dying cycles, nearly alike on both sides."""
    cycles = np.arange(2000) / SR * hz
    age = cycles / TICK_PEAK_CYCLES
    envelope = gain_of(db) * age * np.exp(1 - age)
    return envelope * np.sin(2 * np.pi * (cycles + 0.04 * rng.normal(size=(2, 1))))


def free_ring(table, db, hold_s):
    """Struck lever, pin or nuts ring freely in their modes until they are damped."""
    t = np.arange(round((hold_s + 0.11) * SR)) / SR
    envelope = np.minimum(t / .002, 1) * gain_of(-1100 * np.maximum(t - hold_s, 0))
    phases = rng.random((len(table), 1)) + 0.073 * rng.standard_normal((len(table), 2))
    ring = sum(gain_of(mode_db - 60 * t / t60) * np.sin(2 * np.pi * (hz * t + phase[:, None]))
               for (hz, mode_db, t60), phase in zip(table, phases))
    return gain_of(db) * envelope * ring / 2


def clink(rise_s, db, high_hz, low_hz, knock_db, knock_hz, treble_tilt, crack_t60, chatter_db, chatter_s):
    """Close up: a crack and a short chatter ring the rod; the blow also knocks and thuds in the plate."""
    size = 8192
    t, hz = np.arange(size) / SR, np.fft.rfftfreq(size, 1 / SR)
    thud_hz = rng.choice(PLATE_MODES[1:5])[0]  # the spot struck favours one low mode
    pan_db = PAN_SCATTER_DB * rng.standard_normal()
    right_lag = np.exp([[0], [-1j]] * at_hz(LEFT_LEAD, hz))
    noise = irfft(noise_pair(hz.shape, hz, CLOSE_LIKENESS) * right_lag, size)
    chatter = gain_of(chatter_db - 30 * t) / (1 + np.exp(np.minimum((t - chatter_s) / 0.0075, 50)))

    def force(t60, attack_s, chatter_share):
        crack = gain_of(-60 * t / t60) + 1.66 * np.exp(-t / 0.0009)
        return rfft(noise * (crack + chatter_share * chatter) * np.minimum(t / attack_s, 1))

    def peak(centre_hz, relative_width):
        return 1 / (1 + 2j * (hz - centre_hz) / (relative_width * centre_hz))

    # the contact point favours two pitches; fingers widen the rod's modes and shift them each time
    favoured = 2.5 * peak(high_hz, 0.067) + 5.3 * peak(low_hz, 0.045) + 0.68 * peak(low_hz, 0.81)
    held = [(f, width + 130, mode_db) for f, width, mode_db in ROD_MODES]
    rod = .7 + favoured + 1.7 * resonances(held, hz * rng.normal(1, .05), rng.standard_normal(len(held)))
    tilt_db = np.clip(np.log2(hz / 8000 + 1e-6), -1.5, 1) * treble_tilt
    ring = force(crack_t60, rise_s, 0.75) * rod * gain_of(tilt_db + at_hz(CLINK_COLOUR, hz))

    plate = .3 + resonances(PLATE_MODES, hz, rng.normal(1, .3, len(PLATE_MODES)))
    knock_colour = (peak(knock_hz, 0.31) + 0.26 * peak(1200, 0.98) ** 2) * peak(knock_hz, 0.98)
    thud_colour = peak(thud_hz, 0.089) ** 2 + 0.28 * peak(330, 1.0) ** 2
    knock = force(0.048, rise_s + 0.0024, 0.26) * knock_colour * plate
    thud = force(0.09, rise_s + 0.002, .4) * thud_colour * plate

    parts = zip(irfft(np.array([ring, knock, thud]), size), (0, knock_db, THUD_RE_RING_DB))
    sound = sum(gain_of(db + part_db) * part / abs(part.mean(0)).max() for part, part_db in parts)
    fade = np.clip(4 * (1 - t / t[-1]) - 1, 0, 1)
    return sound * fade * gain_of([[pan_db / 2], [-pan_db / 2]])


def scene():
    """At the microphone: close steel and its reflections over scrape, rumble, motor and room noise."""
    steel = np.zeros((2, N))
    for rows, rise_s in ((ROD_CLINKS, CLINK_RISE_S), (ROD_RUBS, RUB_RISE_S)):
        for start_s, *blow in rows:
            add(steel, start_s, clink(rise_s, *blow))
    for table, rows in ((LEVER_MODES, LEVER_KNOCKS), (PIN_MODES, PIN_TINKLES), (NUT_MODES, NUT_JINGLES)):
        for start_s, db, hold_s in rows:
            add(steel, start_s, free_ring(table, db, hold_s))
    for start_s, db, hz in STRAIN_TICKS:
        add(steel, start_s, strain_tick(db, hz))
    for start_s, *sing in ROD_SINGS:
        add(steel, start_s, rod_sing(*sing))
    room = room_noise() + gain_of(REFLECTIONS_DB) * reflections(steel)
    return room + steel + scrape() + plate_rumble() + motor_and_hums()


def record(dry):
    """The microphone cuts the bass steeply, drops a step in the top treble and passes nothing above."""
    bass_cut = signal.butter(8, BASS_CUT_HZ, "high", fs=SR, output="sos")
    thinned = signal.sosfilt(bass_cut, dry) + gain_of(-24) * dry  # a little bass still gets through
    below_shelf, below_top = (signal.firwin(511, hz, window=("kaiser", 9), fs=SR)
                              for hz in (SHELF_HZ, TOP_HZ))
    treble_step = below_shelf + gain_of(-20.5) * (below_top - below_shelf)
    return signal.oaconvolve(thinned, treble_step[None], "same", axes=1)


dry = scene()
out = record(dry)
pcm_store(out)
```